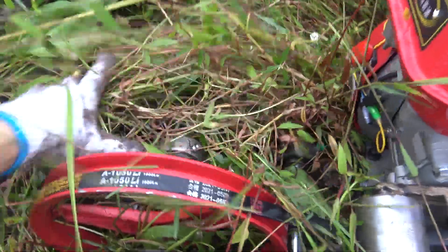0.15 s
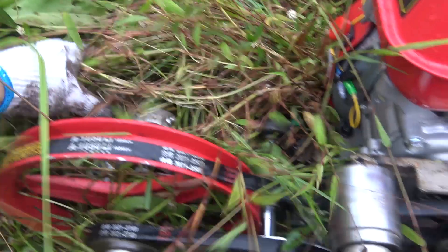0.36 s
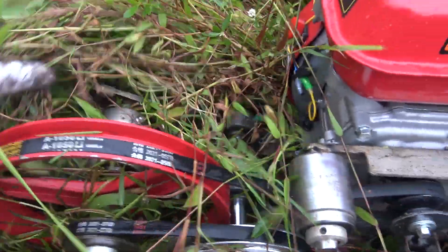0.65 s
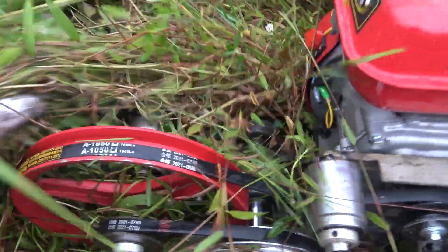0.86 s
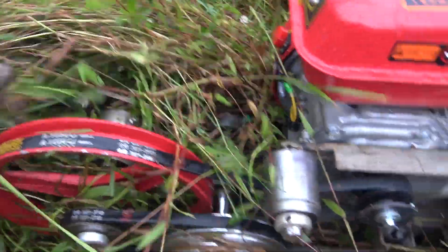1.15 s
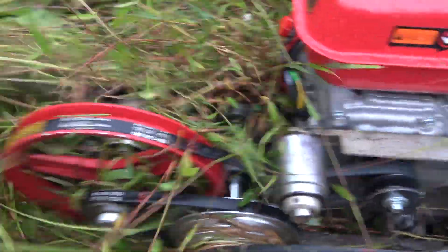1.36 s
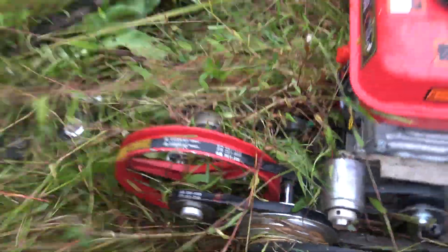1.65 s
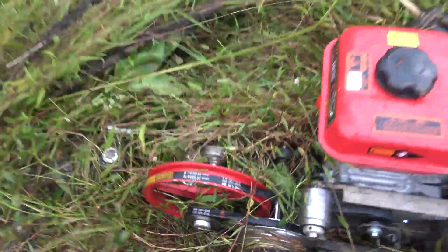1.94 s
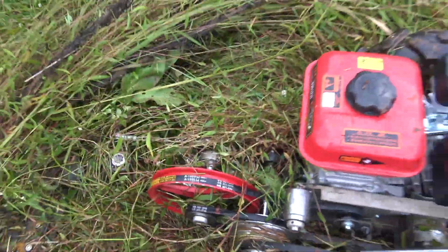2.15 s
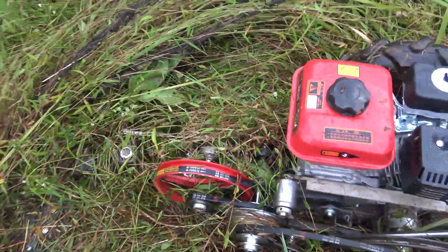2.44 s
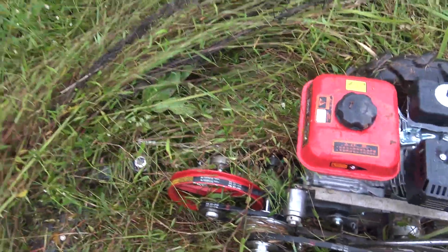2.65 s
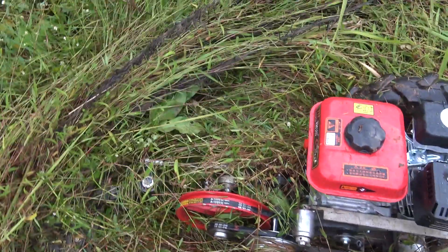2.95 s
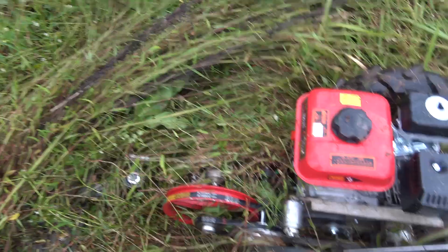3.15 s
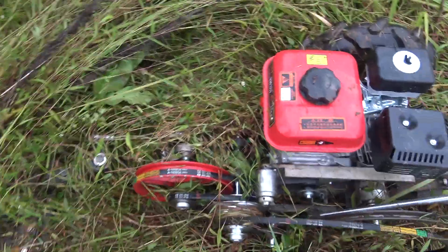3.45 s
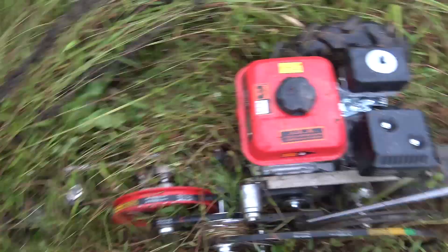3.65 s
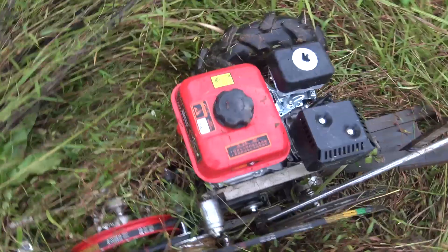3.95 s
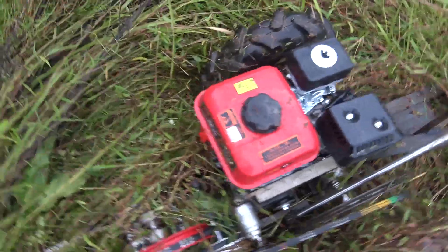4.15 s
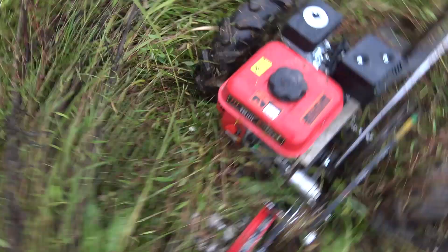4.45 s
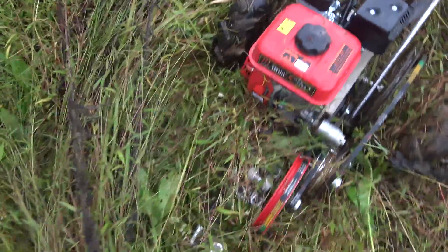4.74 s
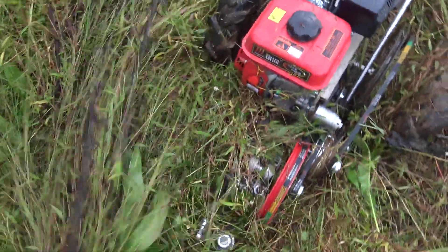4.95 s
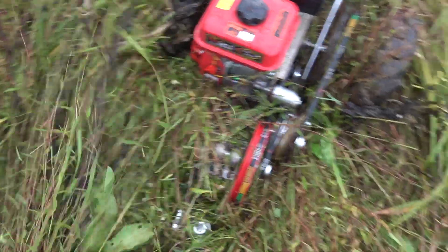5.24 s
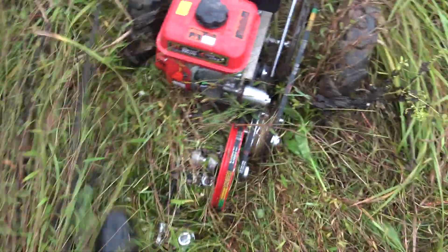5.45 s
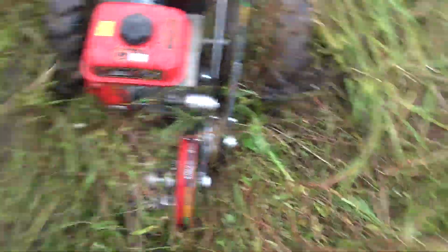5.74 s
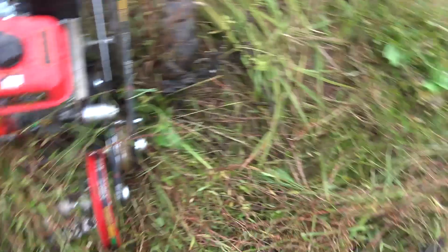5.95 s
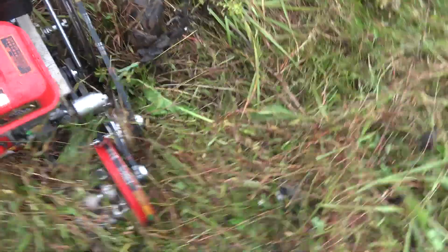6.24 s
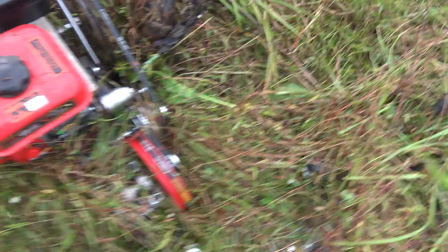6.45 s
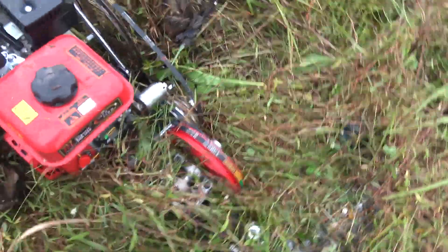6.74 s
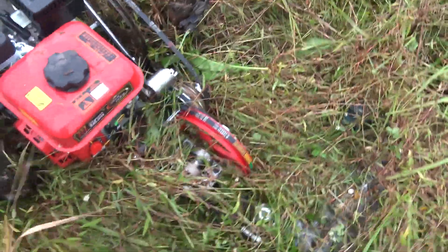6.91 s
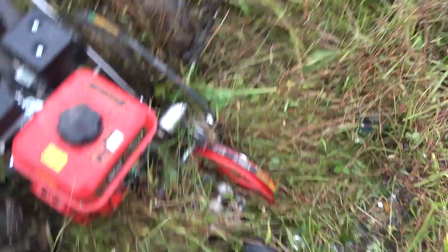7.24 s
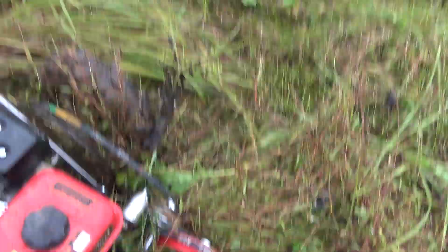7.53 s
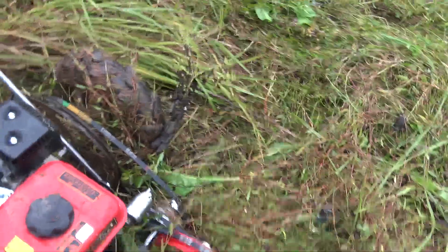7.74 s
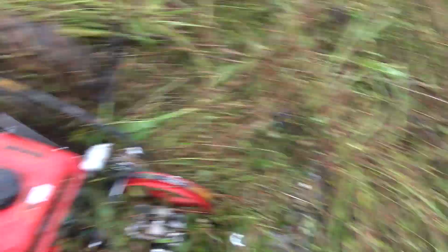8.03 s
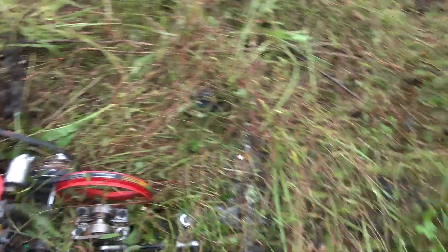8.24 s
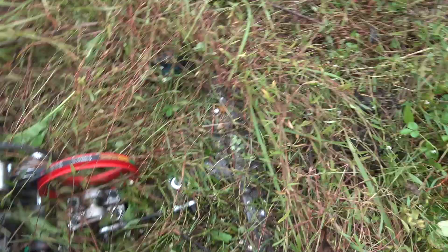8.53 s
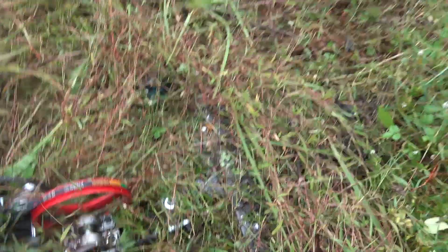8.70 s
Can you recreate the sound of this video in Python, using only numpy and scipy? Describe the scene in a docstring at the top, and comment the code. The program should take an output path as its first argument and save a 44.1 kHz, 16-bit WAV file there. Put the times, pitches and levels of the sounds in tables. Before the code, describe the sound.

Someone walks in wet, overgrown grass, heard very near and dry outdoors. Grainy swishes come in uneven pushes, with crisp crackles at first and tiny ticks of stems flicking free. The movement pauses, settling into quiet rustle, then returns with woody, hollow rubber-boot bumps, brief throbbing hums and dull thuds in the ground. Stems break with ringing cracks, one thin falling bird whistle passes in the distance, and a low steady field hush lies underneath.

```python
"""Rubber boots push through tall wet grass close to a hand-held camera, over the quiet hush of a field.
First come strides of hissing blades, scraping stalks and bright snaps, with two short hums from the boots.
After a lull the pushes return with knocks, thuds and more hums, and a far bird whistles once past 5 s.
Stems go on breaking to the end, often duller and ringing. Grass and hush are shaped noise, snaps are
bursts through resonances, knocks are sines with a noisy shake, hums, thuds and whistle are sines."""
import sys
import numpy as np
from scipy import signal
from scipy.io import wavfile
from scipy.ndimage import uniform_filter1d

SR = 44100
rng = np.random.default_rng(int(sys.argv[2]) if len(sys.argv) > 2 else 0)


def put_to_file(sound):
    """Save the sound as 16-bit audio at rate SR, in the file named by the first command-line argument."""
    columns = np.atleast_2d(sound).T  # one column per channel
    safe = np.clip(columns, -1, 1)
    whole_steps = np.round(safe * 32767)
    wavfile.write(sys.argv[1], SR, whole_steps.astype(np.int16))


N = 391166

# Boots landing or bumping. Each row: start in seconds, level in dB, pitch in Hz.
KNOCKS = [(0.394, -41, 464), (0.581, -38, 450), (1.345, -33, 312), (1.377, -33.5, 434), (3.596, -26.5, 719),
          (3.618, -21.5, 461), (3.625, -33, 310), (3.662, -29, 578), (3.68, -40, 320), (3.784, -31.5, 474),
          (3.937, -34, 482), (4.781, -27, 600), (5.732, -37.5, 482), (6.007, -26.5, 686),
          (6.072, -35.5, 570), (6.11, -33.5, 457), (6.156, -30.5, 561), (6.52, -39.5, 500),
          (6.953, -27, 565), (6.972, -37, 600), (7.173, -21, 545), (7.182, -30, 324), (7.299, -32, 700),
          (7.642, -38.5, 334), (8.708, -35, 335)]
# Resonances of the air in the boot shaft. Each row: pitch in Hz, width in Hz, level in dB.
BOOT_AIR = [(158, 73, -10), (312, 102, -4), (482, 120, -1.5), (673, 373, -7)]


def gain_of(db):
    """Decibels to a factor."""
    return 10 ** (np.asarray(db) / 20)


def evened(x):
    """Scales to an rms of one."""
    return x / np.sqrt(np.mean(x ** 2) + 1e-20)


def smoothed_noise(size):
    """Slow random drift of rms one: white noise averaged over a number of samples."""
    return evened(uniform_filter1d(rng.standard_normal(N), size=size))


def read(points, hz):
    """Reads a spectrum on a log-frequency axis."""
    f, value = np.transpose(points)
    return np.interp(np.log(hz + 1), np.log(f + 1), value)


def add(mix, s, sound):
    """Mixes a sound in at time s."""
    part = mix[..., round(s * SR):][..., :sound.shape[-1]]
    part += sound[..., :part.shape[-1]]


def high_pass(x, order, hz):
    """Thins out everything below a corner pitch."""
    return signal.sosfilt(signal.butter(order, hz, "high", fs=SR, output="sos"), x)


def ring(x, hz, width):
    """A resonance of gain about one at its pitch: a single decaying complex pole."""
    pole = np.exp((2j * np.pi * hz - np.pi * width) / SR)
    return 2 * signal.lfilter([1 - abs(pole)], [1, -pole], x).real


def body(x, modes):
    """Sound passed through a set of resonances of alternating sign."""
    return sum((-1) ** k * gain_of(db) * ring(x, hz, width) for k, (hz, width, db) in enumerate(modes))


def noise(shape, size, patchy_db, flicker_db):
    """Stereo noise of a given spectrum with drifting patches and a flicker shared by all pitches."""
    # Each row: pitch in Hz, likeness of left and right (1 = the same).
    likeness = [(60, 0.99), (180, 0.88), (550, 0.98), (1800, 1), (4000, 1), (8000, 0.93), (13000, 0.96)]
    frames, hz = 4 * N // size + 5, np.fft.rfftfreq(size, 1 / SR)
    a, b, c, d, patches = rng.standard_normal((frames, len(hz), 5)).T
    patches = uniform_filter1d(patches, size=6, axis=0)  # across pitch
    patches = evened(uniform_filter1d(patches, size=14, axis=1))  # across time
    flicker = evened(uniform_filter1d(rng.standard_normal(frames), size=5))
    same = np.clip(read(likeness, hz), -1, 1)[:, None]
    left = a + 1j * b
    right = same * left + np.sqrt(1 - same ** 2) * (c + 1j * d)
    level_db = read(shape, hz)[:, None] + patchy_db * patches + flicker_db * flicker
    spectrum = np.array([left, right]) * gain_of(level_db)
    return evened(signal.istft(spectrum, nperseg=size, noverlap=3 * size // 4)[1][:, :N])


def level(rows, index):
    """One column of a curve as a gain for every sample."""
    rows = np.array(rows)
    return gain_of(np.interp(np.arange(N) / SR, rows[:, 0], rows[:, index]))


def swells(rows, index):
    """Power of a row of swells, each rising to its peak and falling away at its own pace."""
    pointed = 1.29  # 1 = a sharp peak, 2 = a round one
    power = np.zeros(N)
    for row in rows:
        s, rise, fall = row[0], max(row[1], .004), max(row[2], .004)
        t = np.arange(-min(5 * rise, s), 5 * fall, 1 / SR)  # seconds from the peak
        drop_db = 10 * np.where(t < 0, -t / rise, t / fall) ** pointed
        add(power, s + t[0], gain_of(row[index] - drop_db) ** 2)
    return power


def stride(index):
    """Gain of stalks (index 0) or blades (index 1): the pushes over the settling grass."""
    # Pushes through the grass. Each row: loudest moment in seconds, rise and fall in seconds
    # (to 10 dB under the peak, 4 ms at least), stalks scraping in dB, blades hissing in dB.
    pushes = [(.39, 0.07, 0.14, -53, -53.5), (.59, 0.03, 0.05, -48.5, -45.5), (.8, .16, 0.18, -51, -45.5),
              (.93, 0.03, 0.07, -45, -39), (1.11, .08, 0.22, -59, -53), (1.27, 0.01, 0.1, -67, -41),
              (1.36, 0.0556, 0.0553, -43.5, -32.5), (1.45, 0.06, 0.1263, -47.5, -42),
              (1.59, 0.04, 0.0954, -48.5, -41.5), (1.77, 0.15, 0.28, -56, -51), (3.05, 0.05, 0, -59, -48.5),
              (3.2, 0.15, 0.08, -57.5, -46.5), (3.47, 0.2338, 0.1, -59, -43.5),
              (3.64, 0.09, 0.02, -46.5, -63), (3.83, 0.1, 0.09, -42, -48), (3.96, -0.01, 0.2, -53, -55),
              (4.28, 0.05, 0.22, -48, -47), (4.48, 0.18, 0.1, -51.5, -54.5), (4.79, 0.02, 0.06, -49.5, -73),
              (4.88, 0.01, 0.14, -45.5, -44), (5.09, 0.09, 0.1, -46, -41), (5.45, 0.4, 0.33, -67, -54),
              (5.84, 0.03, 0.09, -49, -42), (6.02, 0.0251, 0.07, -46.5, -45.5),
              (6.13, 0.03, 0.18, -47, -47.5), (6.36, 0.11, 0.07, -50.5, -45),
              (6.6, 0.05, 0.0949, -48.5, -43.5), (6.7, 0.06, 0.0857, -43.5, -47.5),
              (6.92, 0.03, 0.01, -49.5, -44), (7.2, 0, 0.16, -54, -58), (7.58, 0.07, 0.08, -50.5, -55),
              (7.68, 0.1, 0.1064, -43.5, -37), (7.77, .06, 0, -47, -38), (7.92, .06, 0.1, -53, -48),
              (8.06, 0.04, 0.05, -43, -46.5), (8.13, 0.18, 0.13, -50.5, -53),
              (8.38, 0.0157, 0.22, -45, -43.5), (8.518, 0.02, 0.04, -36.5, -54)]
    # Bent grass settling between pushes. Each row: time in seconds, stalks in dB, blades in dB.
    settling = [(0, -56.5, -60.5), (.5, -61.5, -62), (1.16, -75, -61.5), (2.25, -62, -62), (2.55, -66, -73),
                (2.95, -78, -70), (3.6, -64, -56), (4.15, -68, -64), (4.75, -64, -61), (5.3, -63, -54),
                (5.74, -58.5, -63.5), (6.5, -56, -54.5), (7.1, -64.5, -60), (7.47, -64, -74.5),
                (8.3, -58.5, -62.5), (8.87, -64.5, -55)]
    return np.sqrt(swells(pushes, index=3 + index) + level(settling, index=1 + index) ** 2)


def hush():
    """The quiet field around the microphone: steady noise with a slow drift and flicker."""
    # Spectrum of the field. Each row: pitch in Hz, relative level in dB per Hz.
    field = [(15, -51), (25, -1), (97, -5), (134, -0.5), (236, -5), (263, -18), (677, -16), (887, -7.5),
             (11600, -20), (16000, -28)]
    return gain_of(-63) * noise(field, size=2048, patchy_db=2.0, flicker_db=3.5)


def bird():
    """A thin falling whistle far away: one sine gliding in pitch and level."""
    # Points along the whistle. Each row: time in seconds, pitch in Hz, level in dB.
    whistle = [(5.21, 5900, -61), (5.27, 5850, -58), (5.32, 5800, -63), (5.38, 5770, -55),
               (5.42, 5750, -62)]
    s, hz, db = np.transpose(whistle)
    t = np.arange(s[0], s[-1], 1 / SR)
    tone = np.sin(2 * np.pi * np.cumsum(np.interp(t, s, hz)) / SR)
    out = np.zeros(N)
    add(out, s[0], gain_of(np.interp(t, s, db)) * tone)
    return out


def boot_rubbing(stalks_gain):
    """Rubbing stirs the air in the shafts: lumpy noise through their resonances, swelling after knocks."""
    rest_db, share_db, follows = -75.5, -33.5, 0.51  # follows: dB of rubbing per dB of stalks
    stir_db, stir_t60_s = -27, 0.66  # a knock stirs the shafts, then they settle
    lumps = gain_of(3.1 * smoothed_noise(size=900))
    near, far = rng.standard_normal((2, N))
    rub = np.array([evened(body(lumps * (near + 0.18 * side * far), BOOT_AIR)) for side in (1, -1)])
    stir_power, t = np.zeros(N), np.arange(SR // 2) / SR
    for s, db, _ in KNOCKS:
        add(stir_power, s, gain_of(db + stir_db - 60 * t / stir_t60_s) ** 2)
    stride_power = (gain_of(share_db) * stalks_gain ** follows) ** 2
    return np.sqrt(gain_of(rest_db) ** 2 + stir_power + stride_power) * rub


def boot_knocks():
    """Each knock rings the rubber as a decaying sine with a noisy shake, and the shaft rings on after it."""
    rise_s, t60_s = 0.00068, .1
    # Shaft ringing after a knock. Each row: pitch in Hz, level in dB, t60 in seconds.
    shaft_rings = [(490, -27, .42), (315.5, -25, 0.41)]
    (out, blows), t = np.zeros((2, N)), np.arange(6144) / SR
    for s, db, hz in KNOCKS:
        shape = (1 - np.exp(-t / rise_s)) * gain_of(-60 * t / t60_s)
        tone = np.sin(2 * np.pi * hz * t)
        air = body(rng.standard_normal(len(t)), BOOT_AIR)
        shake = evened(air + 1.2 * ring(rng.standard_normal(len(t)), hz, 210))
        add(out, s, gain_of(db) * shape * (0.61 * tone + 0.39 * shake))
        add(blows, s, gain_of(db) * evened(rng.standard_normal(64)) / 8)  # short burst of unit energy
    long = np.arange(SR // 2) / SR
    shaft = sum(gain_of(db - 60 * long / t60) * np.sin(2 * np.pi * hz * long) for hz, db, t60 in shaft_rings)
    return high_pass(out, order=2, hz=150) + signal.oaconvolve(blows, shaft)[:N]


def boot_thuds():
    """Soles thud into the soft ground: sines that rise and die over a few of their own cycles."""
    rise, t60 = 0.22, 7.8  # in cycles of the thud's pitch
    # Dull short thuds and taps of the soles. Each row: start in seconds, level in dB, pitch in Hz.
    thuds = [(3.396, -37, 520), (4.781, -38.5, 107), (5.086, -38, 212), (5.291, -35, 240), (5.39, -47, 260),
             (5.615, -44.5, 140), (5.732, -47, 104), (5.758, -37, 220), (5.985, -47, 129),
             (6.555, -35, 332), (6.862, -36, 520), (7.152, -38, 300), (7.38, -40, 330), (7.469, -39, 313),
             (8.707, -44, 104)]
    out, t = np.zeros(N), np.arange(6144) / SR
    for s, db, hz in thuds:
        cycles = hz * t
        shape = gain_of(db - 60 * cycles / t60) * (1 - np.exp(-cycles / rise))
        add(out, s, shape * np.sin(2 * np.pi * cycles))
    return out


def boot_hum():
    """The shaft hums on one wavering note while a leg slides in it; stick and slip make it throb."""
    hum_hz, waver_hz = 484, 7
    # Each row: loudest moment in seconds, rise and fall in seconds (to 10 dB under the peak,
    # 4 ms at least), level in dB.
    hums = [(1.085, .03, .036, -53), (1.53, .012, .035, -49), (3.795, .008, 0.025, -47),
            (3.878, .022, 0.016, -48), (3.946, .008, .022, -45), (4.025, .035, .018, -51),
            (4.146, .016, .03, -52)]
    pitch = hum_hz + waver_hz * smoothed_noise(size=1500)
    throb = 1 + .4 * evened(ring(rng.standard_normal(N), 24, 14))
    return np.sqrt(2 * swells(hums, index=3)) * throb * np.sin(2 * np.pi * np.cumsum(pitch) / SR)


def boots(stalks_gain):
    """Hollow boots: rubbing in stereo, with knocks, thuds and hum a little to the left."""
    struck = boot_knocks() + boot_thuds() + boot_hum()
    return boot_rubbing(stalks_gain) + gain_of([[.6], [-.6]]) * struck


def ticks(blades_gain):
    """Bent wet stems flick free one by one, even when the stride pauses: tiny clicks at eight pitches."""
    per_s = 90
    sizes = gain_of(3.5 * np.minimum(rng.exponential(1, N), 4)) * (rng.random(N) < per_s / SR)
    which, out = rng.integers(0, 8, N), np.zeros((2, N))
    for k, hz in enumerate(np.geomspace(1300, 11000, num=8)):
        left = rng.uniform(.48, .57)
        click = ring(ring(sizes * (which == k), hz, .4 * hz), hz, .4 * hz)
        out += np.outer([left, 1 - left], click)
    return gain_of(-35.5) * evened(out) * blades_gain ** .55


def snaps():
    """Each break is a tick and a burst of splintering: a bright short crack over the ringing stem."""
    # Stems breaking. Each row: start in seconds, level in dB, crack against body in dB,
    # stem pitch in Hz, t60 in seconds (4 ms at least).
    breaks = [(0.2339, -44.5, 11, 1400, 0.027), (8.0411, -34, -3, 1900, .025),
              (8.2425, -41, -3, 2000, .015), (8.057, -35, -3, 2200, 0.01), (8.069, -32, -6, 2000, .025),
              (8.504, -27, -12, 2530, .02), (0.3707, -42, 19.5, 1640, 0.0075),
              (0.444, -30.5, 3.5, 2720, 0.018), (0.5779, -37, 12, 2880, 0.077),
              (0.7378, -43, 23.5, 1280, 0.02), (0.7896, -28, 11, 3160, 0.014), (0.803, -25, 5, 1820, 0.016),
              (0.9145, -21, 10, 2920, 0.018), (0.9205, -28, 10, 2330, 0.0077),
              (0.9236, -21, 5, 1970, 0.008), (0.9374, -21.5, 7, 2600, 0.013),
              (1.238, -32.5, 6.5, 1750, 0.013), (1.2981, -26, 5.5, 2270, 0.0092),
              (1.303, -23, 8.5, 3160, .009), (1.310, -31.5, 11, 2600, 0.026), (1.3202, -29, 8, 2500, .007),
              (1.325, -31, 12, 2190, 0.0071), (1.3422, -16.5, 7, 2600, 0.0089),
              (1.348, -16, 5, 2020, 0.012), (1.3533, -20, -1, 2160, 0.01), (1.357, -17, -4, 2020, 0.013),
              (1.372, -14.5, -1, 1720, 0.01), (1.3744, -18.5, 1, 2600, .01), (1.3784, -19, 6, 1980, 0.014),
              (1.381, -20, 5, 1630, 0.012), (1.414, -14, 4, 1840, 0.0066), (1.743, -41.5, 28, 3160, 0.019),
              (3.619, -18, -9.5, 1840, 0.033), (3.6292, -16, -7, 1000, 0.017),
              (3.6632, -22.5, -9, 1700, 0.03), (3.8058, -23, -32, 1670, 0.042),
              (3.8393, -33, -4, 1720, 0.024), (3.9326, -25, -6, 1790, 0.013),
              (4.788, -20, -20, 2230, 0.022), (4.799, -28.5, -45, 1090, 0.026),
              (4.863, -22, -28, 1760, 0.016), (4.8774, -30.5, -32, 1790, 0.033),
              (6.009, -19, -3, 1090, 0.036), (6.1131, -13, -14.5, 1570, 0.029),
              (6.1556, -25.5, -4, 1490, 0.025), (6.186, -30, 0, 1100, 0.015),
              (6.214, -35.5, 10, 2070, 0.012), (6.4145, -27, -5, 2920, 0.013),
              (6.473, -29, -23, 1590, 0.013), (6.6783, -10.5, 6, 2370, 0.013),
              (6.7152, -21.5, -4, 2120, 0.031), (6.7751, -20.5, -2, 1170, 0.008),
              (6.9455, -24, -40, 2070, 0.018), (6.951, -25, -45, 1340, .025),
              (7.1735, -17, -7, 2670, 0.022), (7.235, -31, -10, 2630, 0.036),
              (7.301, -31.5, -22, 1010, 0.016), (7.628, -25, -14, 2130, 0.0078),
              (7.7622, -33.5, 11, 3370, 0.016), (8.394, -28, -0.5, 2660, 0.03),
              (8.512, -24.5, -10, 2210, 0.04)]
    # Splintering fibres. Each row: pitch in Hz, width in Hz, level in dB.
    stem_modes = [(1294, 1260, -3), (2420, 1960, 1), (3760, 1660, -1)]
    # The sharp edge of a break. Each row: pitch in Hz, width in Hz, level in dB.
    crack_modes = [(5040, 1540, -2.5), (7870, 2360, 2.5)]
    # The stiff boot shell, set ringing when a thick stem breaks against it.
    # Each row: pitch in Hz, level in dB, t60 in seconds.
    shell_modes = [(938, -4.5, 0.096), (1340, -0.5, 0.069), (1640, -4.5, 0.064), (1880, 0.5, 0.095),
                   (2053, -3.5, 0.077), (2230, -1.5, 0.043)]
    shell_full_db, shell_most = -46, 0.51  # a crack this weak gives the shell its largest share
    out, t = np.zeros((2, N)), np.arange(4096) / SR
    for s, db, crack_db, hz, t60 in breaks:
        a, b, c = rng.standard_normal((3, len(t)))
        tick = 7.3 * (t == t[8])
        fall = gain_of(-60 * t / max(t60, .004))
        after = gain_of(-15 - 60 * t / 0.053)  # bent neighbours spring back
        decay = fall + after
        burst = (a + tick) * np.minimum(t / 0.00031, 1) * decay
        # thick wet stems break dull and ring; thin dry ones splinter
        fibres = gain_of(0.29 * min(crack_db, 0)) * body(burst, stem_modes)
        stem = fibres + 1.07 * ring(ring(burst, hz, 870), hz, 870)
        edge = (b + tick) * decay * np.minimum(t / 0.00021, 1)
        # thin dry stems are brightest
        crack = body(edge, crack_modes) + gain_of(-6.5 + 0.25 * crack_db) * ring(edge, 11300, 4700)
        # a little treble noise of opposite sign left and right widens the crack
        side = 0.2 * ring(ring(c * decay, 7800, 4200), 8800, 4200)
        crack = crack + np.outer([1, -1], side)
        # modes near the stem's pitch ring most
        shell = sum(gain_of(mode_db - 6 * abs(np.log2(f / hz))) * ring(burst, f, np.log(1000) / np.pi / ring_s)
                    for f, mode_db, ring_s in shell_modes)
        share = np.clip(crack_db / shell_full_db, 0, 1) * shell_most
        sound = (1 - share) * stem / abs(stem).max() + share * shell / abs(shell).max()
        sound = sound + gain_of(crack_db) * crack / abs(crack).max()
        pan_db = 0.82 + 0.93 * c[0]  # left over right
        add(out, s, gain_of(db) * sound * gain_of([[pan_db / 2], [-pan_db / 2]]))
    return high_pass(out, order=2, hz=120)


def rustle(shape, per_s, spread_db, grain_db, patchy_db, flicker_db):
    """A swish whose loudness jumps with every small slip of leaf on leaf and dies within milliseconds."""
    sizes = gain_of(spread_db * np.minimum(rng.exponential(1, N), 3.5))
    slips = sizes * (rng.random(N) < per_s / SR)
    jumps = evened(signal.lfilter([1], [1, -np.exp(-1 / (0.0011 * SR))], slips))
    hiss = noise(shape, size=256, patchy_db=patchy_db, flicker_db=flicker_db)
    return evened((1 + gain_of(grain_db) * jumps) * hiss)


def grass(stalks_gain, blades_gain):
    """Stalks scrape low, blades hiss high: two grainy noises that follow the stride."""
    # Spectrum of the scrape. Each row: pitch in Hz, relative level in dB per Hz.
    stalk_shape = [(150, -38), (500, -21.5), (1000, -1.5), (2000, -2), (3200, -4), (6000, -9.5),
                   (12000, -27)]
    # Spectrum of the hiss. Each row: pitch in Hz, relative level in dB per Hz.
    blade_shape = [(1000, -14), (3000, -4), (8000, -2), (11000, -4.5), (13500, -9.5), (16000, -13.5)]
    stalks = rustle(stalk_shape, per_s=250, spread_db=5.0, grain_db=-7.0, patchy_db=1.5, flicker_db=2.5)
    blades = rustle(blade_shape, per_s=140, spread_db=4.5, grain_db=-11, patchy_db=1.8, flicker_db=1.4)
    return stalks_gain * stalks + gain_of([[.5], [-.6]]) * blades_gain * blades  # blades lean left


def scene():
    """Grass, stems, boots and bird over the hush of the field."""
    stalks_gain, blades_gain = stride(index=0), stride(index=1)
    background = hush() + bird()
    return background + boots(stalks_gain) + ticks(blades_gain) + snaps() + grass(stalks_gain, blades_gain)


def record(dry):
    """The microphone drops the deepest bass; then the band limit of the camera."""
    edge_hz = 15900
    thinned = high_pass(dry, order=1, hz=30)
    band_limit = signal.firwin(511, edge_hz, window=("kaiser", 9), fs=SR)
    return signal.oaconvolve(thinned, band_limit[None], "same")


dry = scene()
out = record(dry)
put_to_file(out)
```